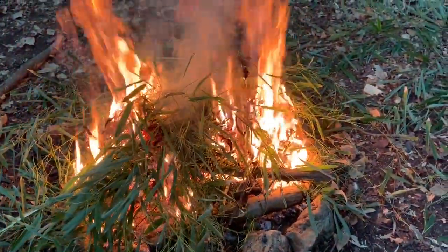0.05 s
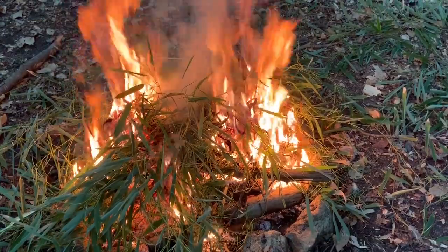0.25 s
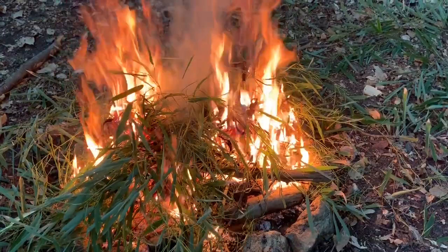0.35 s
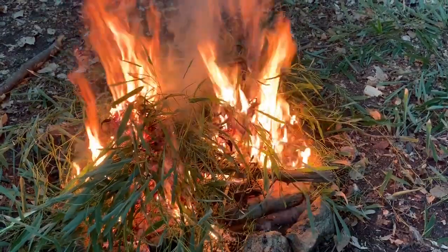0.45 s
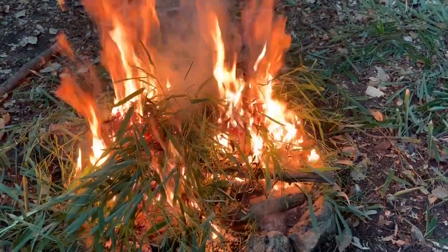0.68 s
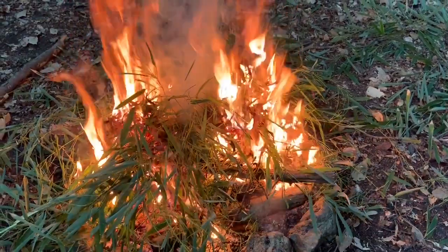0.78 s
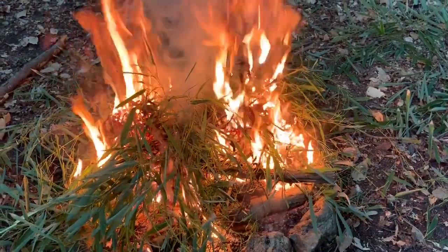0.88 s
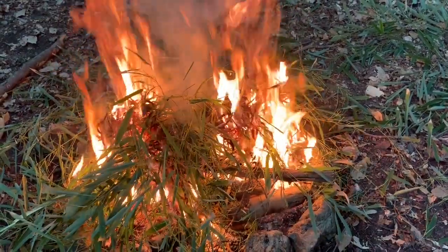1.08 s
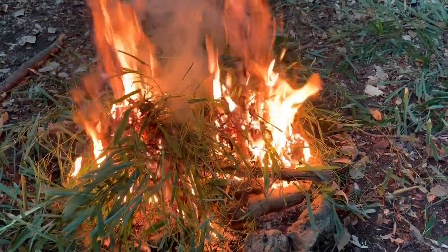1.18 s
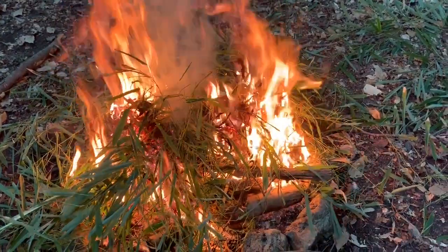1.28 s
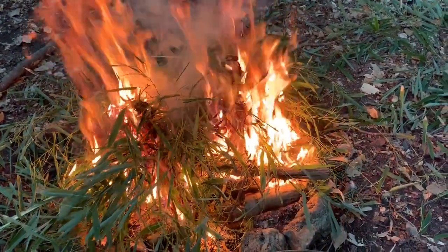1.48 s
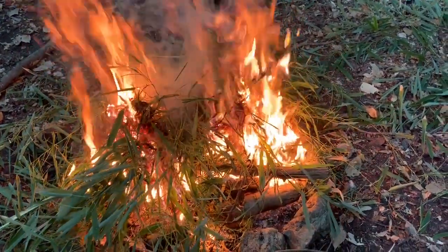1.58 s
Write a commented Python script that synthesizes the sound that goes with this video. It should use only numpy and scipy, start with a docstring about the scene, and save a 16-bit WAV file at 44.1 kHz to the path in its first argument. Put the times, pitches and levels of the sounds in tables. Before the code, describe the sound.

A campfire crackles close up, sharp irregular pops and bright ticks over low fluttering flames.

```python
"""Green leaves on a campfire

Green grass and leaves burn close to a pair of microphones, outdoors, over a faint steady background.
Boiling sap is a bright noisy sizzle with tiny bursts; flames are low fluttering noise under a steadier rush.
Leaf cells tick and twigs knock as short puffs of noise; stems pop with a crack and a falling thump.
Cracks, ticks, knocks and sizzle reach the left microphone a little later than the right."""
import sys
import numpy as np
from scipy import signal
from scipy.fft import rfft, irfft
from scipy.io import wavfile
from scipy.ndimage import uniform_filter1d

SR = 44100
rng = np.random.default_rng(int(sys.argv[2]) if len(sys.argv) > 2 else 0)


def int16_out(signal):
    """Quantize to a 16-bit WAV file."""
    q = np.round(np.clip(np.atleast_2d(signal).T, -1, 1) * 32767)
    wavfile.write(sys.argv[1], SR, q.astype(np.int16))


def gain_from_decibels(decibels):
    """Convert decibel values to linear amplitude factors."""
    exponent = np.asarray(decibels, float) / 20
    return 10 ** exponent


N = 72765  # samples in the scene
LENGTH = 2048  # samples in one short sound
QUIET_TAIL_DB = -28  # start of a weak tail, against the main puff


def evened(x):
    """Scales a sound to an rms (average strength) of one."""
    return x / np.sqrt(np.mean(x ** 2) + 1e-20)


def read(points, hz):
    """Reads a two-column table between its points, on a log-frequency axis."""
    p = np.array(points)
    return np.interp(np.log(hz + 1), np.log(p[:, 0] + 1), p[:, 1])


def curve(points):
    """Turns a table of times and dB levels into a gain for every sample."""
    return gain_from_decibels(np.interp(np.arange(N) / SR, *np.transpose(points)))


def coloured(x, points, tilt_db=0):
    """Filters by a dB table, tilted in dB per octave around 7.5 kHz, with no sound before its cause."""
    n = x.shape[-1]
    hz = abs(np.fft.fftfreq(n, 1 / SR))
    gain_db = read(points, hz) + tilt_db * np.log2((hz + 500) / 8000)
    log_gain = np.log(gain_from_decibels(np.maximum(gain_db, -120)))
    # The Hilbert transform finds the phase that keeps the filter from ringing early (minimum phase).
    response = np.exp(np.conj(signal.hilbert(log_gain)))
    return np.fft.ifft(np.fft.fft(x) * response).real


def wobble(span_s):
    """Slow random movement with an rms of one: noise averaged twice over the span."""
    width = round(span_s * SR)
    smooth = uniform_filter1d(rng.standard_normal(N), width)
    return evened(uniform_filter1d(smooth, width))


def add(mix, s, sound):
    """Mixes a sound in at time s (seconds)."""
    part = mix[round(s * SR):][:len(sound)]
    part += sound[:len(part)]


def burst(points, t60, db, tail_db, tilt_db=0, rise_s=.00015, snap=4.3):
    """A snap and a fast-dying puff of noise with a weak tail; t60 is the time to fall 60 dB."""
    crest_db, tail_t60_s = 5, .06  # room for peaks above the average level; fall of the tail
    t = np.arange(LENGTH) / SR
    fall = gain_from_decibels(-60 * t / t60) + gain_from_decibels(tail_db - 60 * t / tail_t60_s)
    shape = (1 - np.exp(-t / rise_s)) * fall
    x = rng.standard_normal(LENGTH) * shape
    x[round(rise_s * SR)] += snap
    x = coloured(x, points, tilt_db=tilt_db)
    # The finished burst gets the energy of its plain shape, whatever the filter did.
    return x * gain_from_decibels(db - crest_db) * np.linalg.norm(shape) / np.linalg.norm(x)


def air():
    """Steady outdoor background: filtered noise, independent at each microphone."""
    # colour of the background: f/Hz, level/dB
    air_colour = [(200, -81.5), (450, -45), (900, -41.5), (1700, -53.5), (3000, -47.5), (5000, -67),
                  (8000, -72)]
    return coloured(rng.standard_normal((2, N)), air_colour)


def flames():
    """Low lumpy flutter under a steadier rush, nearly alike at both microphones."""
    # level of the flutter: t/s, level/dB
    flutter_level = [(0.0, -46.5), (.17, -44.5), (.22, -43), (.3, -47.5), (.35, -45.5), (.42, -39.5),
                     (.55, -49), (.66, -32), (.73, -47.5), (.78, -47.5), (.88, -39.5), (1.05, -45.5),
                     (1.3, -45.5), (1.37, -46), (1.5, -48), (1.65, -44.5)]
    # colour of the flutter: f/Hz, level/dB
    flutter_colour = [(15, -51), (25, -50), (40, -12), (55, -4), (75, -0.3), (100, -7.5), (135, -7),
                      (200, -26.5), (400, -73.5)]
    # colour of the upper rush, steadier than the flutter: f/Hz, level/dB
    rush_colour = [(60, -71), (120, -30), (200, -27.5), (320, -35.5), (450, -43.5), (700, -53.5),
                   (1200, -69)]
    same, lump_db = 0.97, 1.55  # left-right likeness (0-1); rms size of the quick level changes
    one, other = rng.standard_normal((2, 2, N))
    partner = same * one + np.sqrt(1 - same ** 2) * other
    lumps = gain_from_decibels(lump_db * wobble(0.006))
    low, upper = np.stack([one, partner], axis=1) * lumps
    flutter = evened(coloured(low, flutter_colour)) * curve(flutter_level)
    return flutter + coloured(upper, rush_colour)


def sizzle():
    """Steam hiss with countless tiny bursts, partly scattered on its way to each microphone."""
    # level of the sizzle before its colour: t/s, level/dB
    sizzle_level = [(0.0, -46.5), (.13, -46.5), (.23, -48.5), (.3, -41.5), (.35, -37), (.41, -44),
                    (.47, -43.5), (.5, -49), (.57, -48), (.63, -48), (.78, -47.5), (.94, -47.5),
                    (1.02, -45.5), (1.1, -42), (1.14, -43.5), (1.19, -48.5), (1.22, -40), (1.32, -43),
                    (1.5, -44), (1.65, -46)]
    # colour of the sizzle: f/Hz, level/dB
    sizzle_colour = [(200, -35.5), (500, -3), (900, -2.5), (1700, -5), (2800, -3.5), (4300, -0.5),
                     (5600, 4), (7000, 4.5), (8500, 6), (11000, 8.5), (13300, 8.5), (14300, 9.5),
                     (15800, 5.5)]
    # how alike the two microphones hear it: f/Hz, likeness/0-1
    likeness = [(300, 0.3), (700, 0.25), (2000, 0), (3500, 0), (5500, 0.33), (7000, 0.94), (8200, 1),
                (16000, 1)]
    grains_per_s, spread_db, grain_t60_s, grain_db = 250, 3.5, .004, -10
    flicker_db = 0.9

    # Each tiny burst starts at a random moment with a random size, then dies away.
    starts = rng.random(N) < grains_per_s / SR
    size = gain_from_decibels(spread_db * np.minimum(rng.exponential(1, N), 4)) * starts
    fall = gain_from_decibels(-60 * np.arange(LENGTH) / SR / grain_t60_s)
    grains = evened(signal.oaconvolve(size, fall)[:N])
    level = np.sqrt(1 + (gain_from_decibels(grain_db) * grains) ** 2) * gain_from_decibels(flicker_db * wobble(0.011))

    noise = rng.standard_normal((2, N)) * level * curve(sizzle_level)
    one, other = rfft(noise)
    same = read(likeness, np.fft.rfftfreq(N, 1 / SR))
    partner = same * one + np.sqrt(1 - same ** 2) * other
    return coloured(irfft(np.array([one, partner]), N), sizzle_colour)


def knocks():
    """Dull knocks of shifting twigs: bursts without much treble."""
    # the knocks: t/s, level/dB (roughly the peak)
    knock_list = [(.359, -38.5), (1.065, -35.5), (1.401, -35.5)]
    # colour of a knock: f/Hz, level/dB
    knock_colour = [(500, -31), (900, -1.5), (1300, -1), (1800, -15), (3000, -45)]
    mix = np.zeros(N)
    for s, db in knock_list:
        add(mix, s, burst(knock_colour, 0.023, db, QUIET_TAIL_DB))
    return mix


def ticks():
    """Leaf cells ticking: very short bright bursts."""
    # the ticks: t/s, level/dB (roughly the peak), time to fall 60 dB/s
    tick_list = [(.1803, -15.5, 0.0045), (.2270, -15.5, 0.0055), (0.2355, -20, 0.01), (0.276, -24, .005),
                 (0.325, -30, .009), (.3560, -22, .012), (0.39, -19, .006), (0.3965, -29, .006),
                 (.4477, -15, 0.0078), (.4547, -13, 0.0033), (.5570, -37, .006), (0.5911, -23, .006),
                 (0.6146, -20, .006), (0.6599, -22, .006), (.6960, -15.5, 0.0038), (.7120, -17, 0.0053),
                 (.7324, -28, 0.01), (0.7483, -20, 0.0039), (0.7523, -12, 0.0059), (.7805, -37, .005),
                 (.8006, -22.5, 0.0045), (0.8062, -17, 0.0037), (0.817, -26, .005), (0.8346, -13.5, 0.0047),
                 (0.844, -22, 0.0042), (0.9127, -14, 0.005), (0.96, -16, 0.0044), (0.994, -21, 0.0078),
                 (1.0020, -24, .005), (1.0117, -23, .007), (1.0470, -22, .005), (1.1225, -38, .008),
                 (1.181, -28, 0.015), (1.224, -26, .008), (1.4964, -23, 0.0047), (1.5550, -20, 0.0065)]
    # colour of a tick: f/Hz, level/dB
    tick_colour = [(300, -26), (1500, -9.5), (3000, -11.5), (6000, -10), (9000, 5.5), (12000, 5.5),
                   (16000, -4.5)]
    mix = np.zeros(N)
    for s, db, t60 in tick_list:
        add(mix, s, burst(tick_colour, t60, db, QUIET_TAIL_DB))
    return mix


def thump(db, pitch):
    """Gas pushed out of the stem: a few low cycles that sag in pitch; thin stems are higher and quicker."""
    from_hz, to_hz, sag_s = 893, 171.3, 0.0022  # at a pitch factor of 1
    swell_s, fade, start_turn = 0.0022, 1.207, 0.25  # the start is in turns of a cycle
    t = np.arange(LENGTH) / SR * pitch  # a high pitch runs through everything faster
    turns = to_hz * t + (from_hz - to_hz) * sag_s * (1 - np.exp(-t / sag_s))
    u = t / swell_s
    shape = gain_from_decibels(db) * u ** 2 * np.exp(2 - u * fade)
    # A complex wave holds two versions of the thump, a quarter cycle apart.
    x = shape * np.exp(2j * np.pi * (turns + start_turn))
    return signal.lfilter(*signal.butter(2, 81, "high", fs=SR), x)


def pops():
    """Stems bursting: a bright crack, and a low body and thump that differ a little left to right."""
    # the pops: t/s, crack level/dB, body level/dB, thump level/dB (before its swell shape),
    # thump pitch/factor, time for the crack to fall 60 dB/s, crack brightness/dB per octave
    pop_list = [(0.0358, -13.5, -32.5, -56, 1.5, 0.012, 12.5), (0.2452, -5.5, -21, -50, 1.1, 0.0034, 4.5),
                (0.428, -8.5, -15, -40, 1.4, 0.0085, -1.8), (0.4734, -1.5, -5, -20, 1.01, 0.014, -4.5),
                (0.9427, -17, -27, -43.5, 0.91, 0.012, 0.8), (1.1045, -0.5, -9.5, -30, 0.82, 0.014, 4.5)]
    # brightness of each pop's body: tilt/dB per octave
    body_tilts = [1, 1.5, 3, 0.8, -6.5, -1.3]
    # colour of the crack: f/Hz, level/dB
    crack_colour = [(1500, -26), (3000, -5.5), (4300, -4.5), (6000, 4.5), (8500, -2), (11500, 2.2),
                    (14000, -1.5), (16000, 0.5)]
    # colour of the body: f/Hz, level/dB
    body_colour = [(300, -30), (700, -2), (1100, 2.8), (1800, -1.5), (2500, 2), (3500, -9), (5000, -18),
                   (9000, -53)]
    body_t60_s, wide_db, thump_wide = 0.0089, -10.5, 0.13  # the last two: size of left-right differences
    onset = dict(rise_s=.0004, snap=1.6)
    bright, low, wide = np.zeros((3, N))
    for pop, body_tilt_db in zip(pop_list, body_tilts):
        s, crack_db, body_db, thump_db, pitch, t60, tilt_db = pop
        push = thump(thump_db, pitch)
        crack = burst(crack_colour, t60, crack_db, -17, tilt_db=tilt_db, **onset)
        body = burst(body_colour, body_t60_s, body_db, QUIET_TAIL_DB, tilt_db=body_tilt_db, **onset)
        side = burst(body_colour, body_t60_s, body_db + wide_db, QUIET_TAIL_DB)
        add(bright, s, crack)
        add(low, s, body + push.imag)
        add(wide, s, side + thump_wide * push.real)
    return bright, np.array([low + wide, low - wide])


def late_left(x):
    """Delays a sound and changes its level for the left microphone, by amounts that depend on frequency."""
    # left microphone against the right: f/Hz, level/dB, delay/cycles
    left_path = [(20, -0.5, .01), (2650, -.5, 0.5), (4400, -2, 1.19), (5200, -6.5, 1.19), (6670, -1, 1.22),
                 (7120, -1.1, 1.166), (8640, 1.5, 1.517), (10920, -1.4, 2.03), (13550, 2, 2.506),
                 (16300, -9, 3.12)]
    hz = np.fft.rfftfreq(N, 1 / SR)
    f, db, cycles = np.transpose(left_path)
    gain = gain_from_decibels(np.interp(hz, f, db))
    delay = np.exp(-2j * np.pi * np.interp(hz, f, cycles))
    return irfft(rfft(x) * gain * delay, N)


def scene():
    """Cracks, ticks, knocks and sizzle reach the left microphone late; the other sounds are not delayed."""
    cracks, pop_low = pops()
    left, right = cracks + ticks() + knocks() + sizzle()
    return np.array([late_left(left), right]) + pop_low + flames() + air()


def top_cut(x):
    """Nothing passes above the cut-off."""
    return signal.sosfilt(signal.butter(12, 17000, fs=SR, output="sos"), x)


def record(dry):
    """Removes the very highest treble with a steep low-pass filter and finishes the mix."""
    edge = signal.firwin(255, 15950, window=("kaiser", 9), fs=SR)[None]  # cutoff in Hz
    mix = signal.oaconvolve(dry, edge, "same")
    return top_cut(mix)


dry = scene()
out = record(dry)
int16_out(out)
```